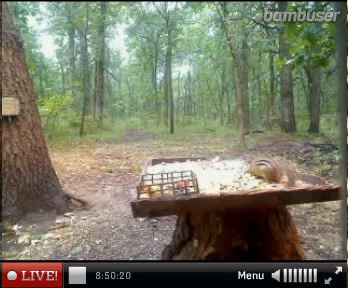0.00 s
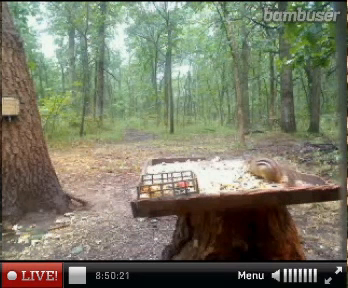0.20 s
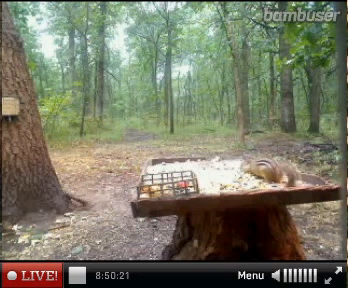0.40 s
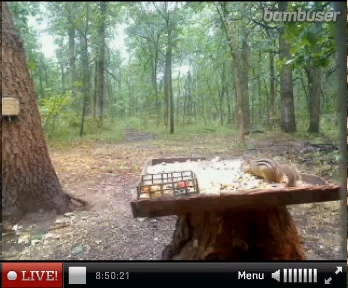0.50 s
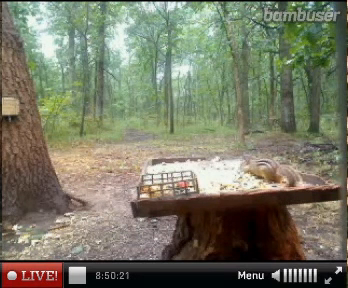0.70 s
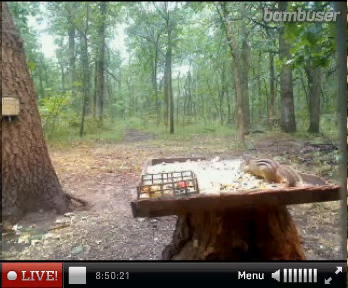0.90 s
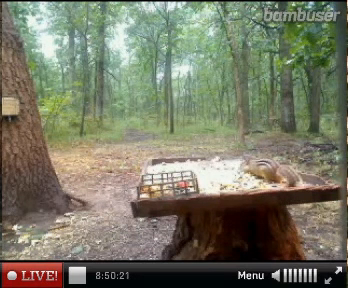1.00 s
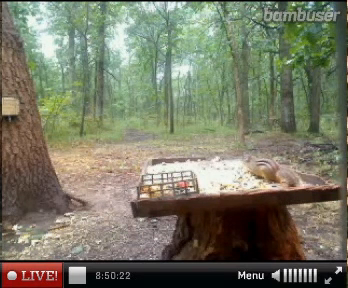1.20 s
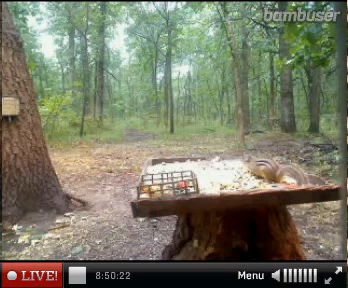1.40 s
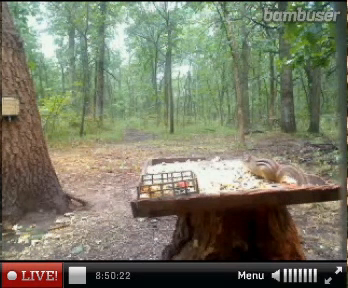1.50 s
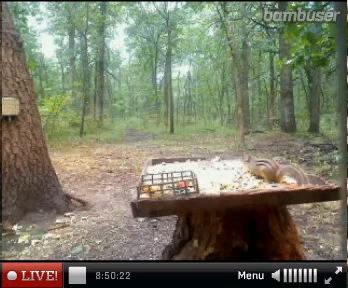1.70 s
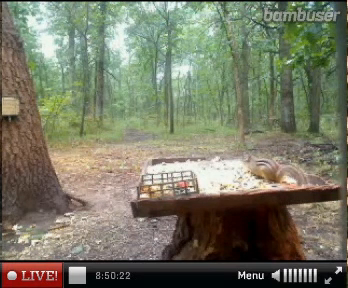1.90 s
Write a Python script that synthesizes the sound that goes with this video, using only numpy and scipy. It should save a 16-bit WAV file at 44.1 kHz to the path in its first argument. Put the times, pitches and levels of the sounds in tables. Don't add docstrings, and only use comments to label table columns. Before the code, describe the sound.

A chipmunk chips sharply at about 0.2, 0.95 and 1.65 seconds, close to a small camera microphone. Each very brief call falls from a high whistle through a rasp to a louder, hollow cluck, with short woodland echoes. Husks or claws tick on wood, notably near 0.7 seconds. Faint bird peeps and a slight leaf rustle come around 1.4 to 1.6 seconds, over quiet airy hiss and weak hum.

```python
import sys
import numpy as np
from scipy import signal
from scipy.fft import rfft, irfft
from scipy.io import wavfile
from scipy.ndimage import uniform_filter1d

SR = 44100
rng = np.random.default_rng(int(sys.argv[2]) if len(sys.argv) > 2 else 0)


def nominal_scale(level):
    x = np.asarray(level, float) / 20
    return 10 ** x


def waveform_to_disk(signal):
    frames = np.transpose(np.atleast_2d(signal))
    scaled = np.clip(frames, -1, 1) * 32767
    samples = np.round(scaled).astype(np.int16)
    wavfile.write(sys.argv[1], SR, samples)


N = 85995

# frequency [Hz], relative level [dB].
AIR_COLOUR = [(30, -21), (60, -3.5), (170, 0.5), (400, -5.5), (1000, -12), (3000, -21), (8000, -29),
              (10500, -34.5)]
# start [s], length [s], start pitch [Hz], level [dB], swell [dB].
WHISTLES = [
    (0.207, 0.017, 5530, -42.5, 1),
    (0.949, 0.017, 5374, -47, 14.5),
    (1.646, .0205, 5425, -49.5, 17.5),
]
# centre [Hz], width [Hz], level re the whistle [dB].
RASP_BANDS = [(6110, 720, -22), (4640, 1440, -18.5), (8900, 5400, -33.5)]
# start [s], length [s], level [dB], colour [Hz], width [Hz].
TICKS = [(0.214, .002, -51.5, 1600, 600), (0.706, 0.0028, -60.5, 930, 600),
         (0.7064, 0.0011, -65, 2360, 700), (0.7107, 0.0062, -56.5, 2280, 800),
         (0.712, 0.0056, -57.5, 870, 600), (0.7158, 0.0047, -62.5, 5300, 6900),
         (0.72, 0.0032, -66, 2260, 700), (0.9281, 0.00163, -63, 1600, 600),
         (.929, 0.00203, -68, 4400, 1500), (1.399, .005, -72.5, 7500, 5000),
         (1.400, 0.0043, -73, 6680, 600), (1.455, .005, -77, 8500, 4000), (1.6251, .002, -62, 1550, 600),
         (1.835, .005, -73, 6000, 7000)]
# start [s], length [s], start pitch [Hz], end pitch [Hz], level [dB].
CLUCKS = [
    (.22333, .01115, 1419, 852, -13.4),
    (.9671, .01154, 1357, 724, -16.4),
    (1.665, .009, 1332, 801, -15.3),
]
# multiple of the pitch, level [dB].
CLUCK_OVERTONES = [(2, -36.5), (3, -36), (4, -45), (5, -45.5)]
# delay [s], level [dB].
TRUNKS = [(.019, -13.5), (.0245, -20.5), (.047, -33), (.066, -34.5), (.095, -25), (0.112, -33.5)]
# start [s], length [s], pitch [Hz], level [dB].
PEEPS = [
    (1.393, .03, 3760, -77.5),
    (1.447, .04, 3760, -77),
    (1.556, 0.027, 2500, -75.5),
    (1.596, .05, 2620, -77),
]

RIM_S = .00654


def level(x, db):
    return x * nominal_scale(db) / np.sqrt(np.mean(x ** 2))


def band(x, hz, width):
    return signal.lfilter(*signal.iirpeak(hz, hz / width, fs=SR), x)


def steep_band(x, hz, width):
    return band(band(x, hz, width), hz, width)


def gate(t, length, attack, release):
    rise = np.sin(np.pi / 2 * np.clip(t / attack, 0, 1)) ** 2
    return rise * np.exp(-np.maximum(t - length, 0) / release)


def running_phase(hz):
    return 2 * np.pi * np.cumsum(hz) / SR


def echo(x, taps):
    n = np.arange(N)
    return sum(nominal_scale(db) * np.interp(n - s * SR, n, x) for s, db in taps)


def walk(rate):
    k = int(SR / rate)
    steps = np.repeat(rng.standard_normal(N // k + 1), k)
    return 1.3 * uniform_filter1d(uniform_filter1d(steps, k), k)[:N]


def air(t):
    f = np.maximum(np.fft.rfftfreq(N, 1 / SR), 1)
    hz, db = np.transpose(AIR_COLOUR)
    colour = nominal_scale(np.interp(np.log(f), np.log(hz), db)) * f ** 2 / (f ** 2 + 25 ** 2)
    noise = rfft(rng.standard_normal(N)) * colour
    octave = np.clip(np.log2(f / 60), 0, 8)
    hiss = 0
    for k in range(9):
        share = np.clip(1 - abs(octave - k), 0, 1)
        hiss = hiss + nominal_scale(0.56 * walk(6.2)) * irfft(noise * share, N)
    leaves = level(band(rng.standard_normal(N), 3000, 3000), -75.5)
    gust = np.exp(-((t - 1.445) / 0.17) ** 2) * nominal_scale(1.7 * walk(15))
    hum = nominal_scale(-82) * np.sin(2 * np.pi * 128.4 * t)
    return level(hiss, -64) + leaves * gust + hum


def whistle(t):
    floor_hz = 3000
    breath = uniform_filter1d(rng.standard_normal(N), size=24) * 5
    rasp = sum(nominal_scale(db) * level(steep_band(rng.standard_normal(N), hz, width), 0)
               for hz, width, db in RASP_BANDS)
    out = 0
    for start, length, hz, db, swell_db in WHISTLES:
        u = t - start
        pitch = np.clip(hz - (hz - floor_hz) * u / length, floor_hz, None)
        phase = running_phase(pitch * (u > 0))
        shape_db = np.interp(u / length, [0, 0.6, 0.67, 1],
                             [0, swell_db, 0.44 * swell_db - 3, 0.24 * swell_db - 11])
        octave = nominal_scale(-24.5 + 10.5 * np.clip(u / length, 0, 1)) * np.sin(2 * phase)
        tone = (1 + nominal_scale(-21.5) * breath) * (np.sin(phase) + octave)
        out = out + nominal_scale(db + shape_db) * gate(u, length, .002, .00041) * tone
        break_gate = gate(u - length + .006, .009, .00203, .005)
        out = out + nominal_scale(db + 0.76 * swell_db) * break_gate * rasp
    return out


def table_bounce(high):
    return echo(high, [(.00214, -3.5), (RIM_S, -11.5)])


def ticks(t):
    clicks_per_s = 3600
    clicks = rng.standard_normal(N) * (0.31 + 3 * (rng.random(N) < clicks_per_s / SR))
    out = 0
    for start, length, db, hz, width in TICKS:
        first_click = 13.6 * np.clip(1 - abs(t - start) * SR, 0, 1)
        push = clicks * gate(t - start, length, .0004, .00067) + first_click
        out = out + nominal_scale(db) * np.sqrt(SR / 4 / width) * steep_band(push, hz, 1.41 * width)
    return out


def cluck(t):
    note, overtones = 0, 0
    flutter = 1 + .8 * walk(500)
    for start, length, hz, end_hz, db in CLUCKS:
        u = t - start
        share = np.clip(u / length, 0, 1)
        pitch = end_hz + (hz - end_hz) * (1 - share) ** .76
        phase = running_phase(pitch * (u > 0))
        size = nominal_scale(db - 7.4 * share) * gate(u, length, .0031, .0035)
        note = note + size * np.sin(phase)
        buzz = sum(nominal_scale(d) * np.sin(k * phase) for k, d in CLUCK_OVERTONES)
        overtones = overtones + size * nominal_scale(16 * share) * flutter * buzz
    cheek, throat = band(note, 1203, 132), band(note, 856, 132)
    nose = steep_band(overtones, 1650, 800)
    table = echo(note, [(.00209, -12.4)])
    rim = -echo(note, [(RIM_S, -16)])
    return cheek + throat + nose + table + rim


def wood(x):
    t = np.arange(SR // 2) / SR
    near, far = rng.standard_normal((2, len(t)))
    near = near * nominal_scale(-60 * t / .05) * (t > .004)
    far = signal.lfilter(*signal.butter(1, 5000, fs=SR), far)
    far = far * nominal_scale(-60 * t / .49) * (t > .02)
    tail = nominal_scale(-10) * near / np.linalg.norm(near) + nominal_scale(-24) * far / np.linalg.norm(far)
    return signal.fftconvolve(x, tail)[:N]


def clearing(high, low):
    hollow = nominal_scale(-6) * steep_band(low, 1090, 380)
    return echo(nominal_scale(-19) * high + hollow, TRUNKS) + wood(nominal_scale(-1) * high + hollow)


def bird(t):
    waver = walk(80)
    out = 0
    for start, length, hz, db in PEEPS:
        tone = np.sin(running_phase(hz * (1 + 0.002 * waver)))
        out = out + nominal_scale(db + 2.6 * waver) * gate(t - start, length, .0066, .012) * tone
    return out


def scene():
    t = np.arange(N) / SR
    high, low = whistle(t), cluck(t)
    near = high + table_bounce(high) + low
    return (near + clearing(high, low) + ticks(t) + bird(t) + air(t))[None]


def band_limit(x):
    return signal.sosfilt(signal.butter(12, 13700, fs=SR, output="sos"), x)


def record(dry):
    kept = signal.sosfilt(signal.cheby2(8, 30, 11190, fs=SR, output="sos"), dry)
    mirror = kept * np.cos(np.pi * np.arange(N))
    leak = steep_band(mirror, 11700, 1300)
    return band_limit(kept + nominal_scale(-7) * leak)


dry = scene()
out = record(dry)
waveform_to_disk(out)
```